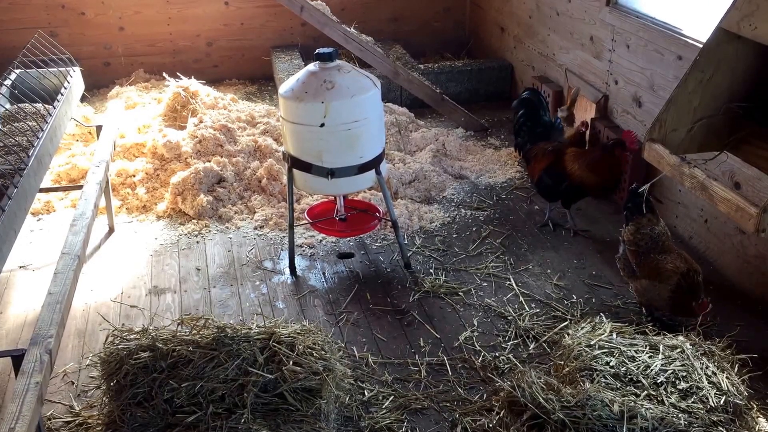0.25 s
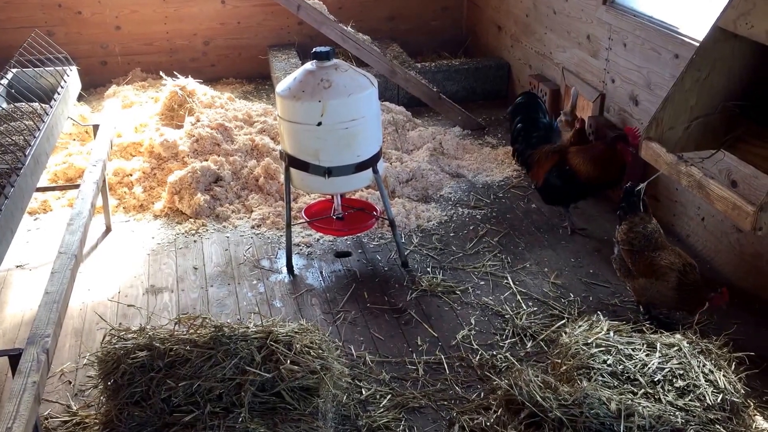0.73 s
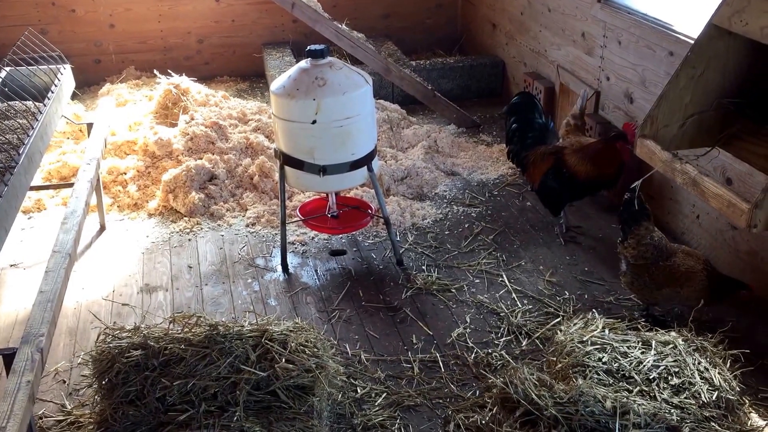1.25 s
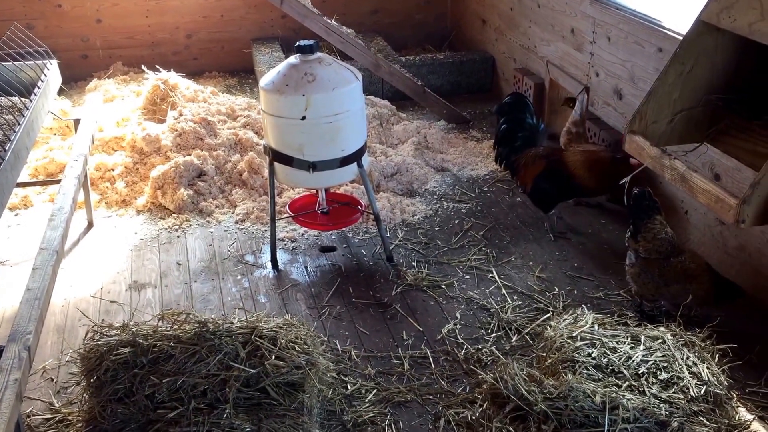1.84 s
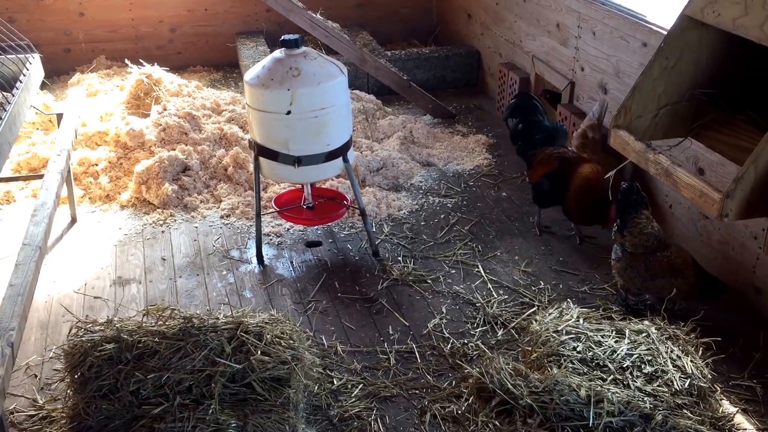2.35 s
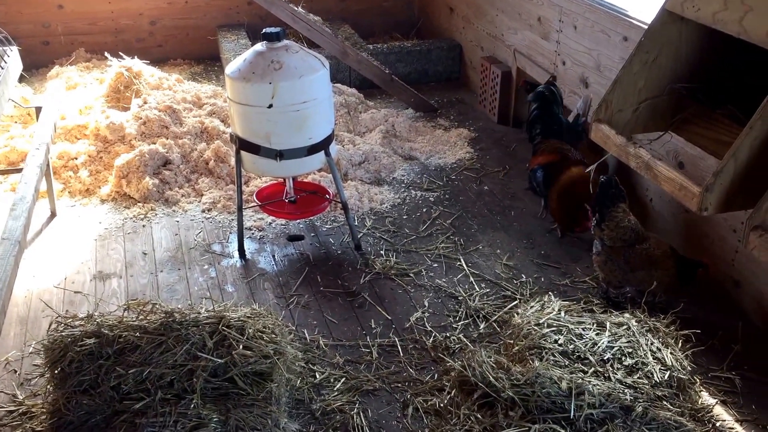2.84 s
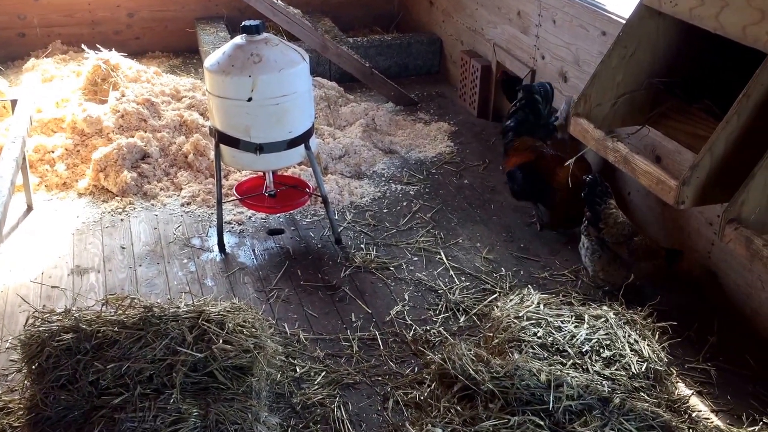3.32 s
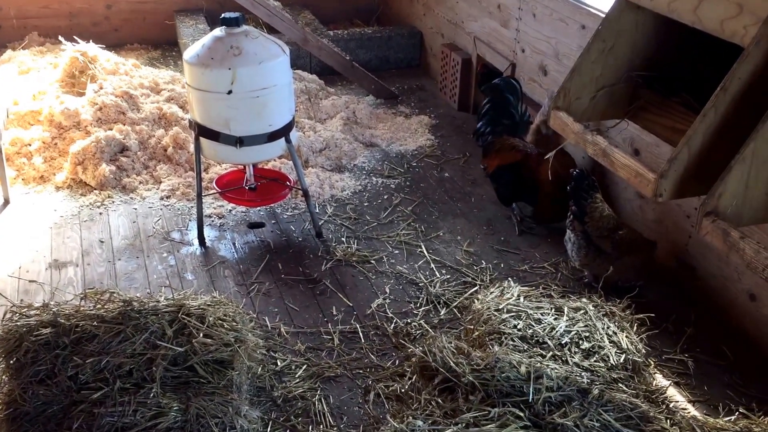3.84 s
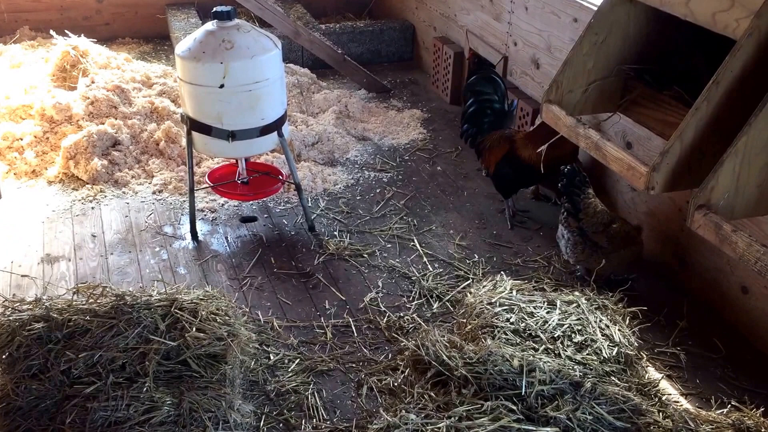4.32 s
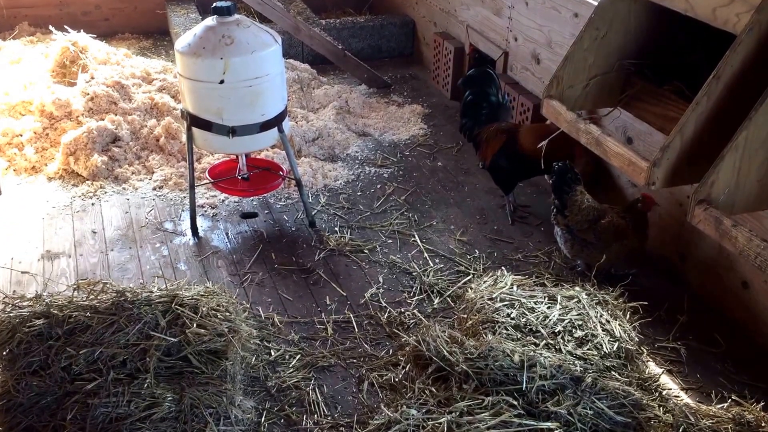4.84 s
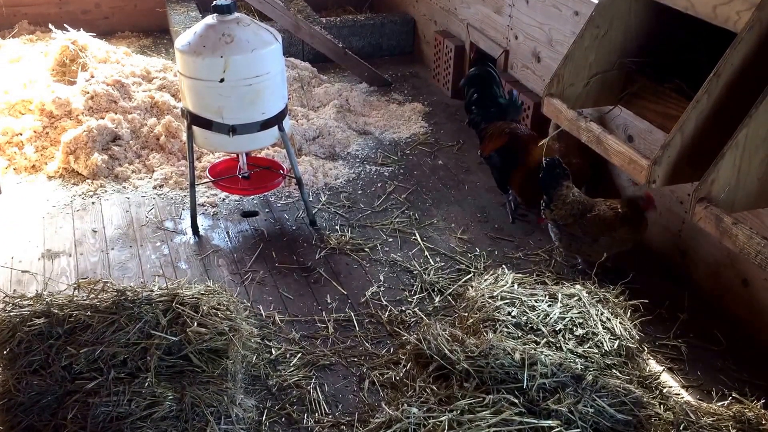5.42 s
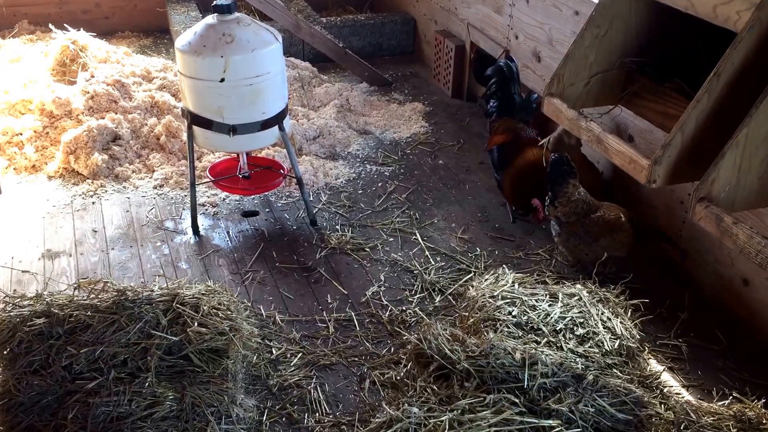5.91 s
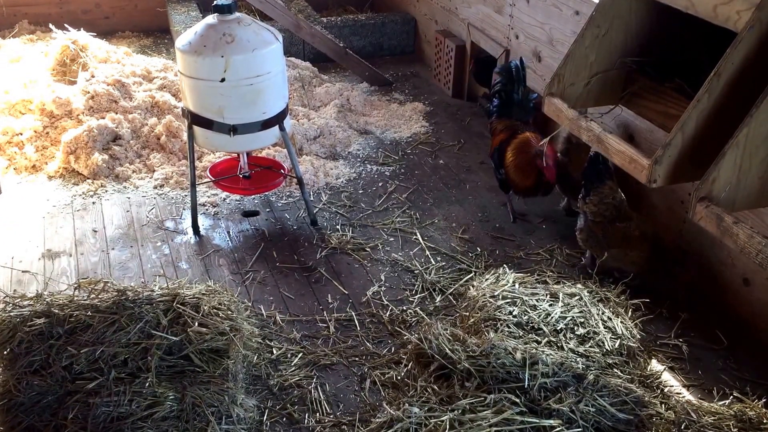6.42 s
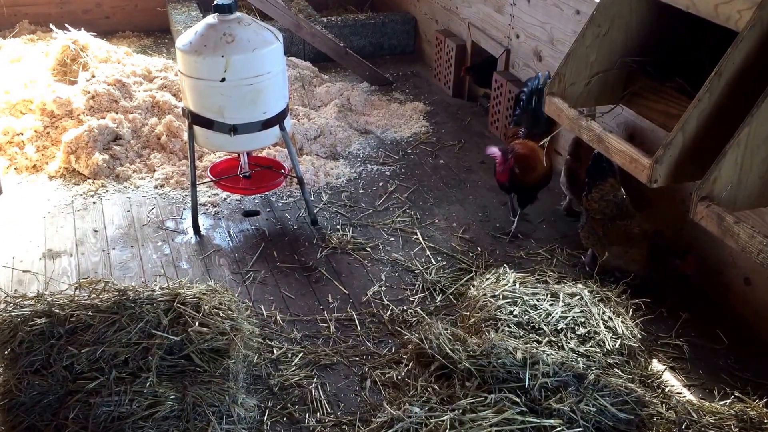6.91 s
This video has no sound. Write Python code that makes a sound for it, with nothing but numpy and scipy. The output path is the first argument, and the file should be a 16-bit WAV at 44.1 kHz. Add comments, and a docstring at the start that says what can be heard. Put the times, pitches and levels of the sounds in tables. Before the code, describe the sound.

Uneven beak raps on wood echo briefly in a chicken coop, among clicking claws, rustling straw and soft thuds on planks.

```python
"""Two chickens forage in a wooden coop, a few metres away.
For the first two seconds beaks mostly rap a wall board. Duller raps on the floor follow until
about 5 s, a few with a squeak; after that, feet thud on the planks. Throughout, claws click,
straw snaps and rustles, and feathers swish. Each blow excites the wood and echoes round the
small room, over a faint steady hiss."""
import sys
import numpy as np
from scipy import signal
from scipy.fft import rfft, irfft
from scipy.io import wavfile
from scipy.ndimage import uniform_filter1d

SR = 44100
rng = np.random.default_rng(int(sys.argv[2]) if len(sys.argv) > 2 else 0)


def wrap_up_sound(samples):
    """Save the sound to the file named by the first command line argument, as 16-bit audio."""
    columns = np.atleast_2d(samples).T
    # keep every value between -1 and 1, then stretch to whole-number steps
    tamed = np.clip(columns, -1, 1)
    steps = np.round(tamed * 32767).astype(np.int16)
    wavfile.write(sys.argv[1], SR, steps)


N = 316094
BLOW_SAMPLES, LEAD_SAMPLES = 32768, 2205
AGE_S = (np.arange(BLOW_SAMPLES) - LEAD_SAMPLES) / SR  # 0 at contact
SINCE_S = np.maximum(AGE_S, 0)
THICK_CORNER_HZ, THIN_CORNER_HZ = 327, 850  # tilt corners: planks; boards and stalks

# Thump, body, knock, clack and tick bands. Each row: low edge in Hz, high edge in Hz, base room t60 in s.
REGISTERS = [(46.2, 218, 0.27), (188.4, 577, 0.38), (583, 1316, 0.39), (1330, 3660, 0.3),
             (3120, 16000, 0.23)]
# Swishes of feathers and chaff. Each row: centre in seconds, level in dB.
SWISHES = [(0.243, -74), (0.33, -65.5), (1.391, -67.5), (1.475, -75), (3.286, -76), (3.445, -72.5),
           (5.744, -78), (5.796, -69.5), (5.868, -74)]


def wall_pecks(gain_db=-6.5, second_hz=915.3, t60_s=0.17):
    """A beak raps the wall board; where it lands decides which notes ring loudest."""
    # Each row: contact in seconds, skid in seconds, relative level in dB, hardness in dB/octave,
    # note in Hz, overtone in Hz.
    pecks = [(0.008, 0.068, -43, -6, 786, 1680), (0.297, 0, -31, -6, 938, 2790),
             (0.343, 0.051, -50.5, 4.5, 970, 2880), (0.427, 0.0078, -42.5, -5, 1106, 2517),
             (0.472, 0.0035, -24.5, 1.4, 1067, 2875), (0.694, 0.0077, -30.5, -1.5, 683.5, 2850),
             (0.897, 0.0092, -28.5, 0.2, 1047, 2900), (1.643, 0.0012, -52, -0.5, 647, 1500),
             (1.681, 0.023, -44, -27, 664, 1820), (1.859, 0.0098, -29, -1.5, 696, 7100),
             (2.05, 0.011, -29, -7.5, 307.7, 1900)]
    # Board modes. Each row: frequency in Hz, relative level in dB, nominal t60 in seconds.
    board_modes = [(302.7, 7.5, 0.22), (440, 1.5, 0.16), (511, -2, 0.1), (672.5, 2, 0.48),
                   (763, -9.5, 0.38), (900, 0.5, 0.37), (1022, 0.5, 0.37), (1169, -1, 0.14),
                   (1362, 5, 0.15), (1393, -0.5, 0.16), (1575, -1.5, 0.29), (1780, -25, 0.11),
                   (2090, -14, .28), (2470, -1.5, 0.2), (2750, -26, 0.24), (2900, -11, 0.29),
                   (2940, -4, 0.31), (4190, -47, .18), (6430, -9, 0.26), (6700, -10, 0.2),
                   (7550, -37, 0.16), (7800, -7, 0.16)]
    # Dense ringing between the modes. Each row: frequency in Hz, relative level in dB.
    spectrum = [(100, -22.5), (300, -11), (380, -12), (650, -4), (1150, -7.5), (1500, -22.5), (1900, -11),
                (2250, -18.5), (2850, -17.5), (3400, -33), (4100, -26), (5400, -34.5), (6800, -17.5),
                (8600, -34), (14000, -37)]
    balance_db = (-24.5, -4, 0, -7, -20)
    out = np.zeros(N)
    for at_s, skid_s, db, hardness, note_hz, overtone_hz in pecks:
        levels_db = register_levels(balance_db, db, hardness, THIN_CORNER_HZ, note_hz, lift_db=9.5)
        humps = [(note_hz, 9), (second_hz, 6), (overtone_hz, 13), (1.12 * overtone_hz, 7)]
        timbre = response(spectrum, BLOW_SAMPLES, humps, ripple_db=6)
        notes = [(note_hz, 11, t60_s), (second_hz, -2, t60_s),
                 (overtone_hz, -8, t60_s / 2), (1.3 * overtone_hz, -15, t60_s / 2)]
        rings = ringing(list(board_modes) + notes)
        sound = blow(timbre, levels_db, skid_s, direct_db=-9.5, t60_scale=1, hold_s=0.038, rings=rings)
        add(out, sound, int(at_s * SR) - LEAD_SAMPLES)
    return out * undb(gain_db)


def floor_pecks(gain_db=-6.5, firm_db=-34.5, firm_t60_s=0.48, halving_db=8.5):
    """Duller raps on the floor; each plank has its own notes, and a firmer rap rings longer."""
    # Each row: contact in seconds, skid in seconds, relative level in dB, hardness in dB/octave,
    # low note in Hz, middle note in Hz, overtone in Hz, overtone lift in dB.
    pecks = [(0.095, 0.0097, -38, 0.5, 380, 550, 1770, 1.5),
             (2.563, 0.0097, -31.5, 1.86, 445, 661, 6760, 10.5),
             (2.785, 0.0078, -35.5, -0.5, 296, 585, 2500, 0),
             (3.023, 0.0079, -38, -1.5, 414, 670.4, 1980, 17.5), (3.266, .012, -43, -4, 456, 659, 1870, 21),
             (3.476, 0.007, -40.5, -6.5, 308, 730, 2080, 33), (3.839, 0.011, -44.5, 1, 298, 677, 2340, 0),
             (3.963, 0.0031, -50.5, -3, 380, 710, 1834, -4), (4.002, 0.0021, -34, 0, 342, 693, 1600, 11.5),
             (4.38, .01, -55.5, 5, 337, 670, 1890, 5), (4.56, 0.0098, -37.5, -2, 271, 566, 1070, 7),
             (4.796, 0.015, -39, 2.5, 260, 637.4, 1380, 6)]
    # Floor modes. Each row: frequency in Hz, relative level in dB, nominal t60 in seconds.
    floor_modes = [(225.6, -5, 0.55), (431, -11, 0.72), (660, 6, 0.3), (709, -1, 0.49), (936, 5.5, 0.22),
                   (1055, -3.5, 0.25), (2274, -3, 0.15), (2700, -47, .13), (4130, -41, 0.18),
                   (6400, -14, 0.1), (6300, -26, 0.14), (12300, -20, 0.083)]
    # Dense ringing between the modes. Each row: frequency in Hz, relative level in dB.
    spectrum = [(50, -41.5), (110, -15), (170, -14.5), (300, 9), (700, 2), (1020, -3.5), (1300, -14.5),
                (2400, -15), (3200, -32.5), (4200, -29.5), (5600, -58), (6800, -33.5), (9000, -51),
                (14000, -50)]
    balance_db = (-7.5, -2, -2.5, -24.5, -37)
    out = np.zeros(N)
    for at_s, skid_s, db, hardness, low_hz, middle_hz, overtone_hz, lift_db in pecks:
        high_hz = 1.42 * middle_hz
        t60_s = firm_t60_s * 2 ** ((db - firm_db) / halving_db)
        levels_db = register_levels(balance_db, db, hardness, THICK_CORNER_HZ, overtone_hz, lift_db)
        levels_db[0] -= 35 * np.log2(low_hz / 285)  # higher planks thump less
        humps = [(low_hz, 7), (middle_hz, 8), (high_hz, 8), (overtone_hz, 7)]
        timbre = response(spectrum, BLOW_SAMPLES, humps, ripple_db=4)
        notes = [(low_hz, 4, 0.57 * t60_s), (middle_hz, 6, t60_s),
                 (high_hz, 0, 0.99 * t60_s), (overtone_hz, -20, t60_s / 2)]
        rings = ringing(list(floor_modes) + notes)
        sound = blow(timbre, levels_db, skid_s, direct_db=-6, t60_scale=np.sqrt(t60_s / 0.46),
                     hold_s=0.022, rings=rings, ring_db=-4, late_db=2.5)
        add(out, sound, int(at_s * SR) - LEAD_SAMPLES)
    return out * undb(gain_db)


def steps(gain_db=-1.5, t60_s=0.15):
    """A padded foot bends a plank, which booms briefly."""
    # Each row: contact in seconds, relative level in dB, hardness in dB/octave, plank note in Hz.
    footfalls = [(0.235, -40, 2, 134.2), (1.465, -63.5, 10, 361), (2.316, -63, 5, 74), (2.409, -61, 1, 286),
                 (2.522, -48, 2.5, 236), (2.815, -43.5, 0, 137.5), (3.437, -58, -6, 399),
                 (3.669, -39.5, -1.5, 218), (3.69, -40.5, 1, 135.4), (3.748, -42, -19, 252),
                 (5.219, -40, 1, 117.7), (5.276, -56, -9, 146), (5.733, -34, 3.5, 119),
                 (5.785, -49.5, 3.5, 163), (5.867, -40, -4, 229), (5.918, -46, -10, 267),
                 (6.449, -47, 9.5, 336), (6.492, -45.5, 4, 330)]
    # Plank response. Each row: frequency in Hz, relative level in dB.
    spectrum = [(45, -49), (85, -8), (118, 3.5), (165, -2), (250, 4.5), (400, 0.5), (600, -14.5),
                (950, -10.5), (1500, -41.5), (3500, -38.5), (8000, -34)]
    balance_db = (-2.5, 0.5, -7, -19.5)
    out = np.zeros(N)
    for at_s, db, hardness, note_hz in footfalls:
        skid_s = 0.0095 * 2 ** (-hardness / 16)  # a softer foot settles more slowly
        levels_db = register_levels(balance_db, db, hardness, THICK_CORNER_HZ, note_hz, lift_db=18)
        timbre = response(spectrum, BLOW_SAMPLES, [(note_hz, 6)], ripple_db=4.5)
        sound = blow(timbre, levels_db, skid_s, direct_db=-8, t60_scale=0.49, hold_s=0.0072,
                     rings=ringing([(note_hz, 0, t60_s)]), ring_db=-4)
        add(out, sound, int(at_s * SR) - LEAD_SAMPLES)
    return out * undb(gain_db)


def snaps(gain_db=-1):
    """Claws and breaking stalks: a sharp crack, then only the room."""
    # Each row: contact in seconds, relative level in dB, hardness in dB/octave.
    cracks = [(1.383, -61.5, 8.5), (2.517, -56, -1.5), (3.341, -55, -4.5), (3.645, -53.5, 9),
              (3.667, -47.5, -2.5), (4.185, -51.5, -1), (4.206, -45, 0.3), (4.763, -59.5, 4.5),
              (5.855, -54.5, 1), (6.171, -50.5, -1), (6.462, -57, 4.5), (6.488, -48.5, 1.7),
              (6.888, -64.5, 2.5)]
    # Stalk response. Each row: frequency in Hz, relative level in dB.
    spectrum = [(60, -10), (300, -3.5), (600, -2.5), (1100, -2), (2100, -1), (3400, -18), (5000, -31.5),
                (8000, -40.5), (14000, -62)]
    balance_db = (-11.5, -10, 1.5, 1, -11)
    out = np.zeros(N)
    for at_s, db, hardness in cracks:
        levels_db = register_levels(balance_db, db, hardness, THIN_CORNER_HZ)
        timbre = response(spectrum, BLOW_SAMPLES, ripple_db=6)
        sound = blow(timbre, levels_db, skid_s=0, direct_db=-2, t60_scale=0.68, hold_s=0.033,
                     late_db=5, late_s=0.075)
        add(out, sound, int(at_s * SR) - LEAD_SAMPLES)
    return out * undb(gain_db)


def straw(grain_db=6, direct_db=-2.5, room_db=-3):
    """Dragged stalks slip in many tiny cracks, which the room smears; feathers and chaff swish above."""
    # Foot drags. Each row: centre in seconds, relative level in dB.
    drags = [(0.292, -53.5), (0.817, -54.5), (1.056, -59), (2.093, -53.5), (2.727, -59.5), (3.553, -57.5),
             (3.796, -55), (4.305, -64.5), (4.577, -64), (5.499, -71), (5.71, -63.5), (5.79, -57)]
    cracks = unit(rng.standard_normal(N) * undb(grain_db * rng.standard_normal(N)))
    drag_envelope = sum(undb(db) * swell(at_s, 0.036) for at_s, db in drags)
    swish_envelope = sum(undb(db) * swell(at_s, 0.035) for at_s, db in SWISHES)
    rustle = unit(band(cracks, 560.6, 1739, order=2)) * drag_envelope
    swish = unit(band(cracks, 2100, 8200, order=1)) * swish_envelope
    return undb(direct_db) * rustle + undb(room_db) * reverb(rustle) + swish


def squeaks(width_hz=800, room_db=-4):
    """A skidding beak chatters over the grain in a narrow, bright band, which the room prolongs."""
    # Each row: centre in seconds, level in dB, band centre in Hz.
    skids = [(1.872, -72, 4400), (2.056, -59, 4400), (2.569, -55, 3970), (4.018, -72, 4970)]
    chatter = rng.standard_normal(N)
    direct = np.zeros(N)
    for at_s, db, hz in skids:
        squeak = unit(band(chatter, hz - width_hz / 2, hz + width_hz / 2, order=2))
        direct += undb(db) * swell(at_s, 0.021) * squeak
    return direct + undb(room_db) * reverb(direct)


def chaff_ticks(level_db=-69.5, lead_s=0.009):
    """Just before each swish peaks, a bit of chaff gives way with a thin, dry tick."""
    out = np.zeros(N)
    for at_s, _ in SWISHES:
        tick = band(noise_tail(t60_s=0.037), 5000, 16000, order=1)
        add(out, unit_peak(tick, window_samples=44), int((at_s - lead_s) * SR))
    return out * undb(level_db)


def hiss(level_db=-69.5):
    """Steady microphone hiss over a faint rumble."""
    # Each row: frequency in Hz, relative density in dB.
    spectrum = [(15, -67), (25, -12), (59, 3), (433, -6), (582, -10), (722, -10.5), (997, -9),
                (1270, -14.5), (1380, -9.5), (15500, -23.5)]
    noise = irfft(rfft(rng.standard_normal(N)) * response(spectrum, N), N)
    return undb(level_db) * unit(noise)


def blow(timbre, levels_db, skid_s, direct_db, t60_scale, hold_s,
         rings=None, ring_db=0, late_db=0, late_s=0.11):
    """One contact: a skid that builds up, the direct crack, any ringing modes and the coop's echoes."""
    # First reflections arrive singly, later ones merge.
    spread_db = 3.1 * np.exp(-SINCE_S / 0.026)
    echoes = rng.standard_normal(BLOW_SAMPLES) * undb(spread_db * rng.standard_normal(BLOW_SAMPLES))
    build_up = min(skid_s / 0.01, 1) * np.exp(-np.abs(AGE_S) / max(skid_s, 1e-4))
    skid = np.where(AGE_S < 0, build_up, 1)
    fading_s = np.hypot(SINCE_S, hold_s) - hold_s  # echoes pile up before they fade
    late_swell = undb(late_db * np.exp(-((AGE_S - late_s) / 0.028) ** 2))
    out = 0
    for (lo_hz, hi_hz, t60_s), db in zip(REGISTERS, levels_db):
        fade = np.exp(-np.log(1000) * fading_s / (t60_s * t60_scale))
        force = echoes * skid * fade
        force[LEAD_SAMPLES] += undb(direct_db) * np.sqrt(np.sum(force ** 2))
        sound = unit_peak(irfft(rfft(force) * timbre))
        if rings is not None:
            sound += undb(ring_db) * unit_peak(rings)
        if lo_hz < 1000:
            sound *= late_swell
        out += undb(db) * unit_peak(band(sound, lo_hz, hi_hz))
    return out


def register_levels(balance_db, db, hardness, corner_hz, note_hz=1000, lift_db=0, width_octaves=0.45):
    """Level per register in dB: a hard contact tilts the treble up, a note lifts the bands near it."""
    centre_hz = np.array([np.sqrt(lo_hz * hi_hz) for lo_hz, hi_hz, _ in REGISTERS[:len(balance_db)]])
    tilt_db = hardness * np.maximum(np.log2(centre_hz / corner_hz), 0)
    note_db = lift_db * np.exp(-(np.log2(centre_hz / note_hz) / width_octaves) ** 2)
    shape_db = np.array(balance_db) + tilt_db + note_db
    return db + shape_db - shape_db.max()


def ringing(modes, scatter_db=1, settle_s=0.2, attack_s=0.00208):
    """Decaying modes, each reaching the listener with its own strength and phase."""
    hz, db, t60_s = np.transpose(modes)[:, :, None]
    phase_turns = rng.random(hz.shape)
    gain = undb(db + scatter_db * rng.standard_normal(hz.shape))
    waves = gain * np.exp(-np.log(1000) * SINCE_S / t60_s) * np.sin(2 * np.pi * (hz * SINCE_S + phase_turns))
    friction = np.exp(-(SINCE_S / settle_s) ** 2 / 2)  # dry joints stop the last faint swings
    return waves.sum(0) * friction * np.clip(AGE_S / attack_s, 0, 1)


def response(points, size, humps=(), ripple_db=0, log_width=0.041):
    """Minimum-phase response through (Hz, dB) points, with (Hz, dB) humps and random ripple."""
    hz, db = np.transpose(points)
    log_hz = np.log(np.fft.rfftfreq(size, 1 / SR) + 1)
    curve_db = np.interp(log_hz, np.log(hz), db)
    for hump_hz, hump_db in humps:
        curve_db += hump_db * np.exp(-((log_hz - np.log(hump_hz)) / log_width) ** 2)
    # Each contact point favours some groups of modes and misses others.
    groups_hz = np.geomspace(100, 16000, 150)
    ripple = np.clip(rng.standard_normal(len(groups_hz)), -2, 1)
    curve_db += ripple_db * np.interp(log_hz, np.log(groups_hz), ripple)
    cepstrum = irfft(np.log(undb(curve_db)), size)
    cepstrum[1:size // 2] *= 2
    cepstrum[size // 2 + 1:] = 0
    return np.exp(rfft(cepstrum))


def reverb(x, t60_s=0.21):
    """Diffuse echoes of the coop."""
    tail = noise_tail(t60_s)
    return signal.fftconvolve(x, tail / np.sqrt(np.sum(tail ** 2)))[:N]


def noise_tail(t60_s):
    """Exponentially decaying white noise."""
    return (rng.standard_normal(BLOW_SAMPLES) * np.exp(-np.log(1000) * SINCE_S / t60_s))[LEAD_SAMPLES:]


def swell(centre_s, half_width_s):
    """Bell-shaped envelope."""
    return np.exp(-2 * np.minimum(np.abs(np.arange(N) / SR - centre_s) / half_width_s, 10) ** 2)


def band(x, lo_hz, hi_hz, order=4):
    """Causal band-pass."""
    return signal.sosfilt(signal.butter(order, [lo_hz, hi_hz], "band", fs=SR, output="sos"), x)


def undb(db):
    """Decibels to gain."""
    return 10 ** (np.asarray(db) / 20)


def unit(x):
    """Scale to rms 1."""
    return x / np.sqrt(np.mean(x ** 2))


def unit_peak(x, window_samples=882):
    """Scale the loudest window to rms 1."""
    return x / np.sqrt(uniform_filter1d(x ** 2, window_samples).max() + 1e-30)


def add(out, x, start):
    """Mix x into out from sample start on."""
    a, b = max(start, 0), min(start + len(x), len(out))
    out[a:b] += x[a - start:b - start]


def scene():
    """The birds and the quiet coop, in mono."""
    blows = wall_pecks() + floor_pecks() + steps() + snaps()
    return (blows + chaff_ticks() + straw() + hiss() + squeaks())[None]


def record(dry, cutoff_hz=15700):
    """Steep low-pass."""
    return signal.sosfilt(signal.ellip(10, 0.1, 70, cutoff_hz, fs=SR, output="sos"), dry)


dry = scene()
out = record(dry)
wrap_up_sound(out)
```